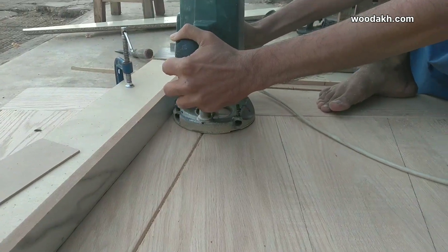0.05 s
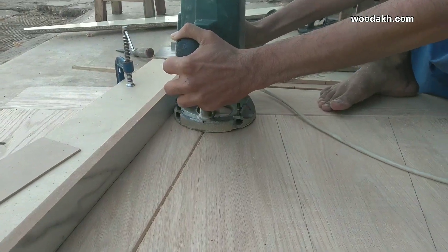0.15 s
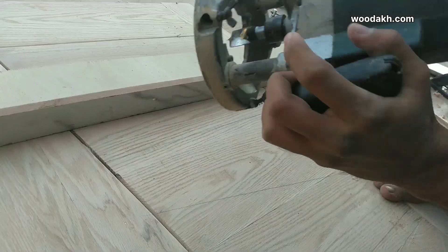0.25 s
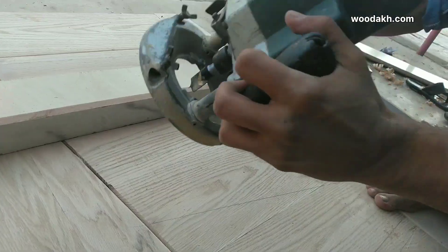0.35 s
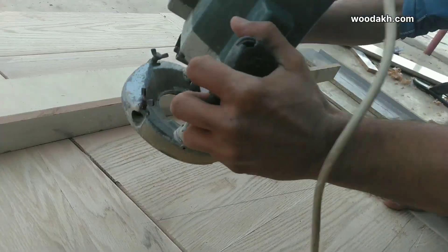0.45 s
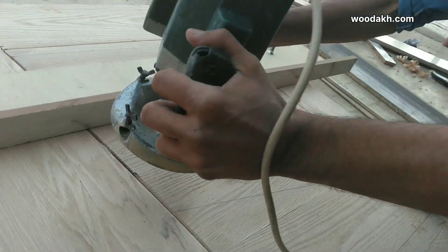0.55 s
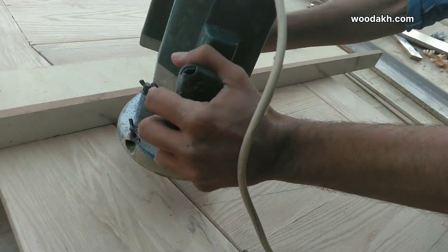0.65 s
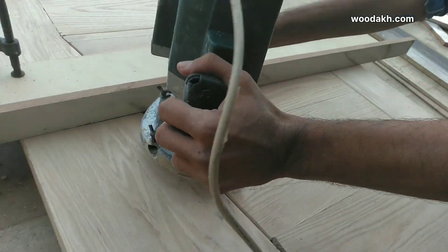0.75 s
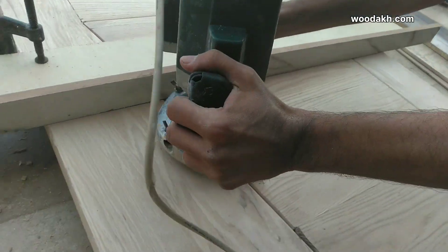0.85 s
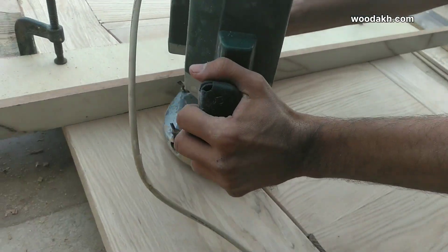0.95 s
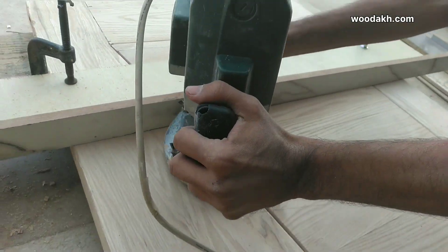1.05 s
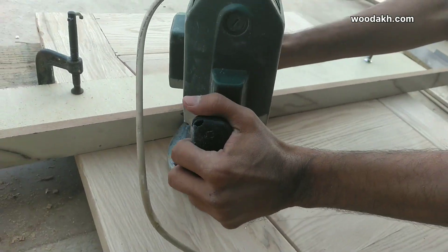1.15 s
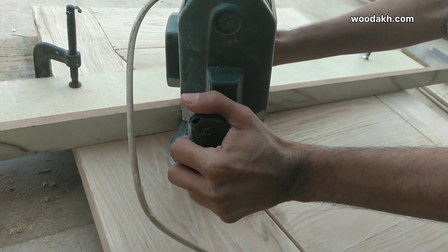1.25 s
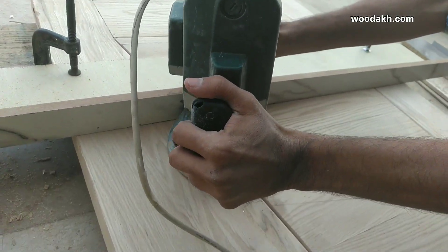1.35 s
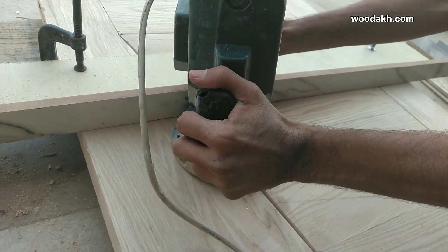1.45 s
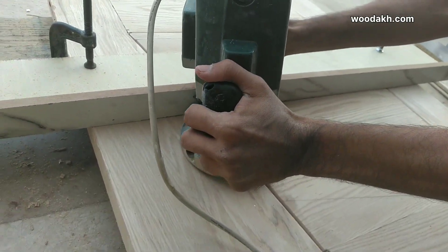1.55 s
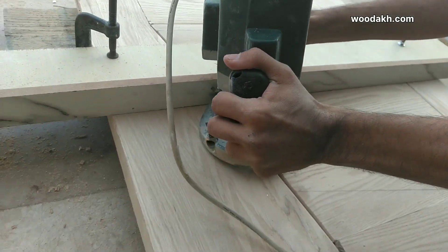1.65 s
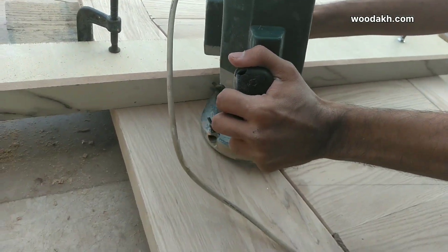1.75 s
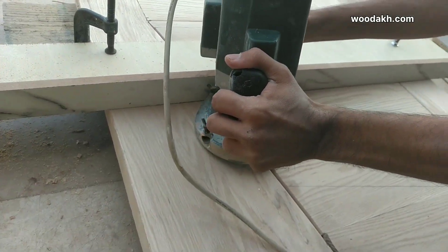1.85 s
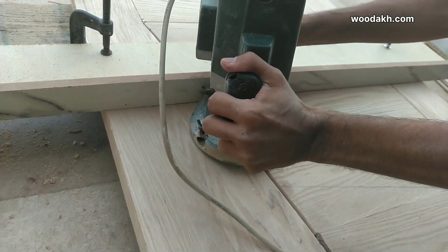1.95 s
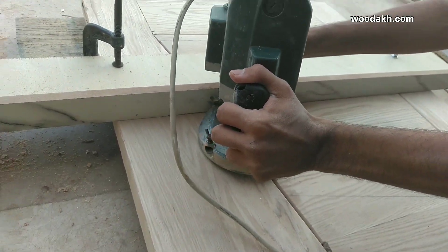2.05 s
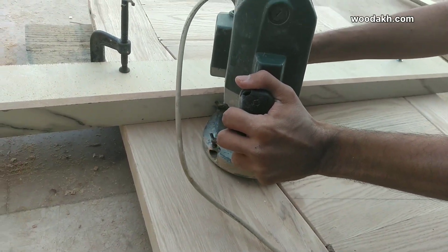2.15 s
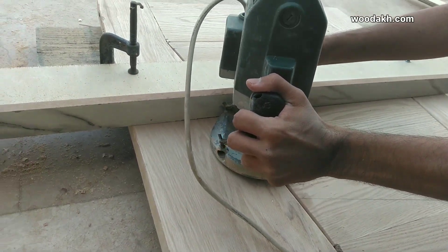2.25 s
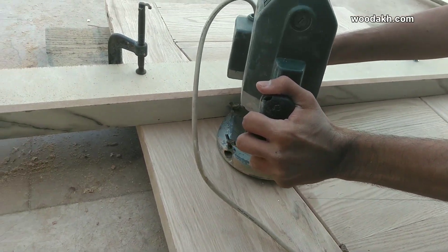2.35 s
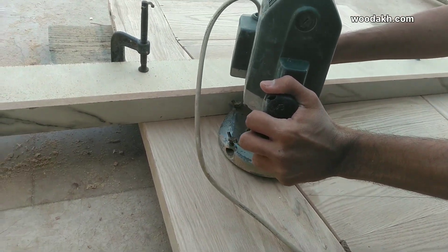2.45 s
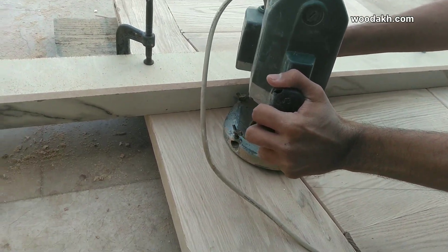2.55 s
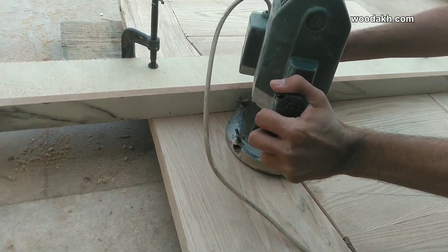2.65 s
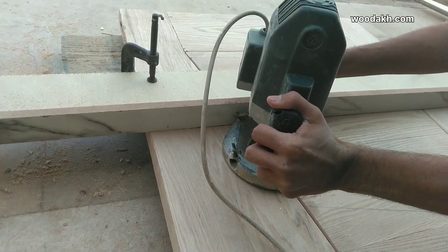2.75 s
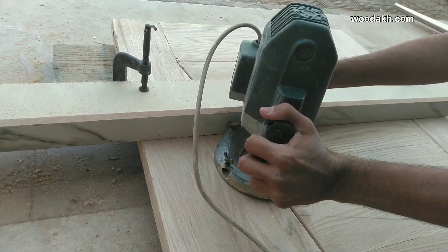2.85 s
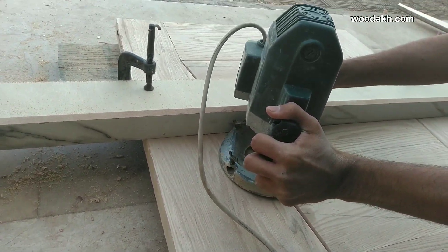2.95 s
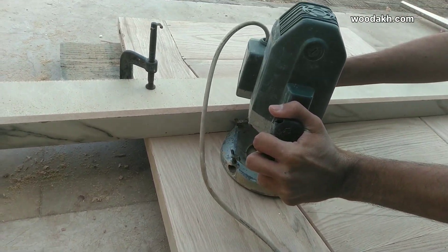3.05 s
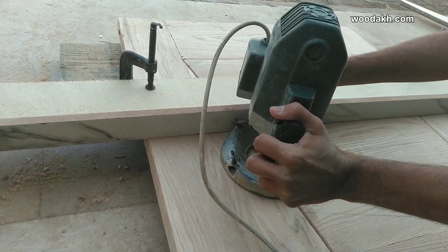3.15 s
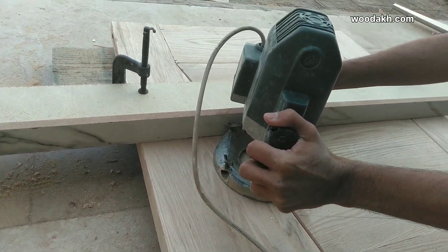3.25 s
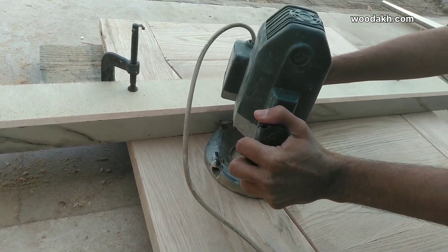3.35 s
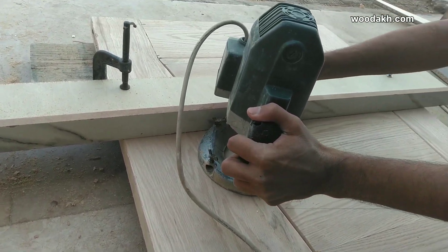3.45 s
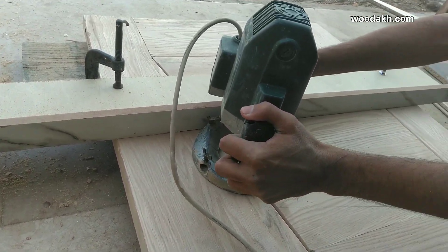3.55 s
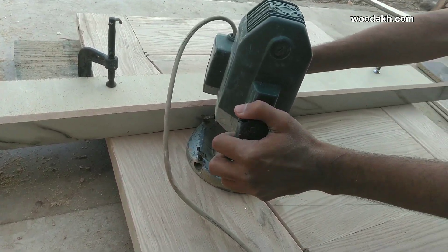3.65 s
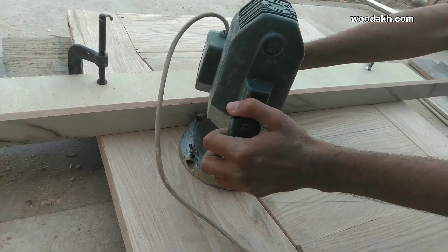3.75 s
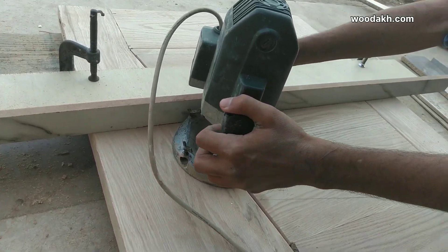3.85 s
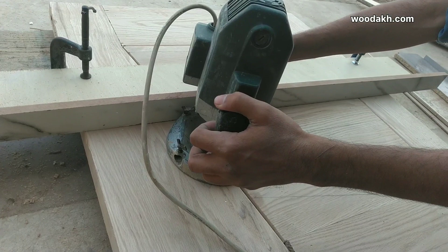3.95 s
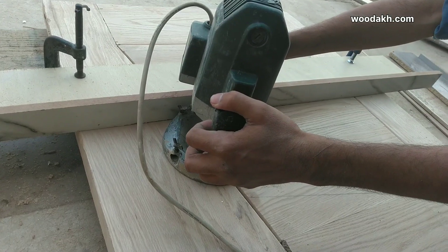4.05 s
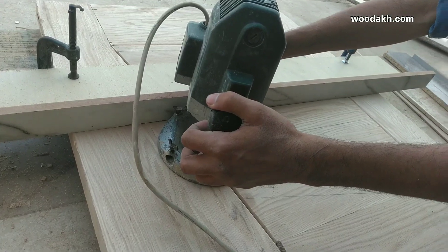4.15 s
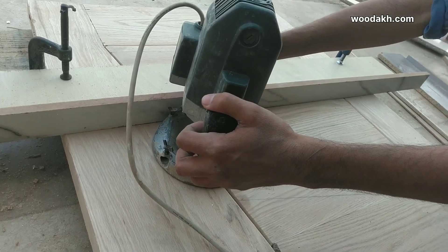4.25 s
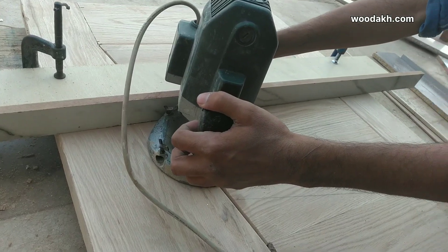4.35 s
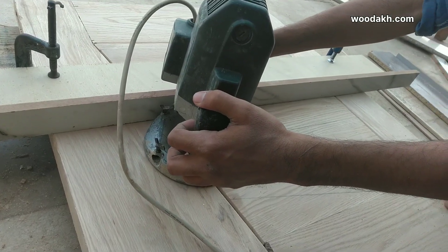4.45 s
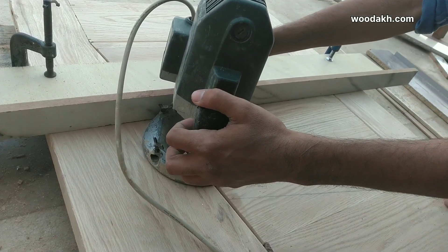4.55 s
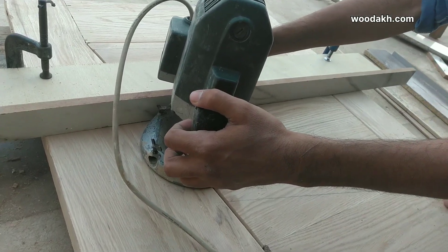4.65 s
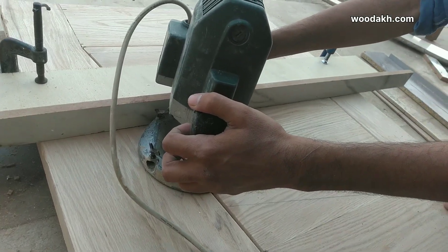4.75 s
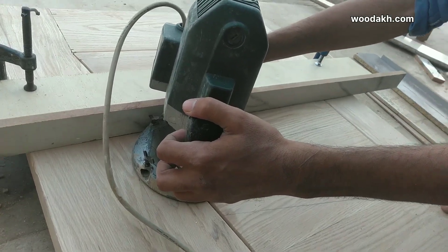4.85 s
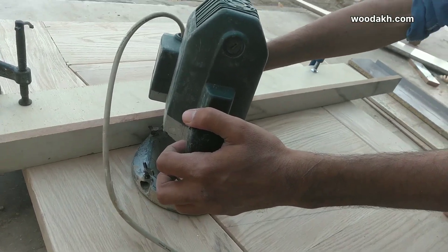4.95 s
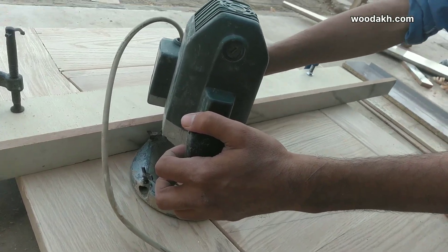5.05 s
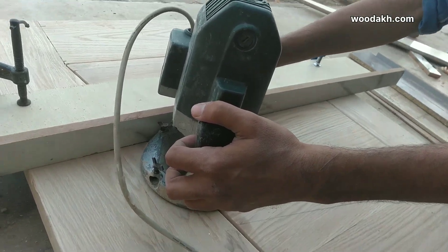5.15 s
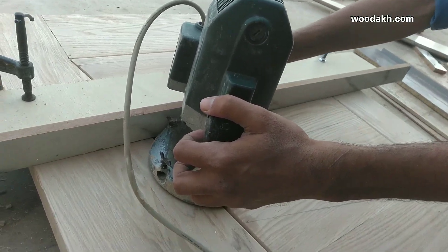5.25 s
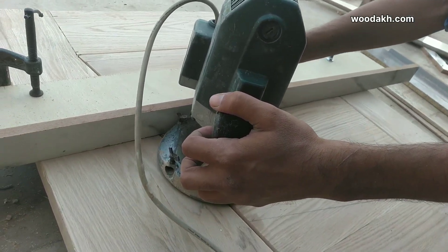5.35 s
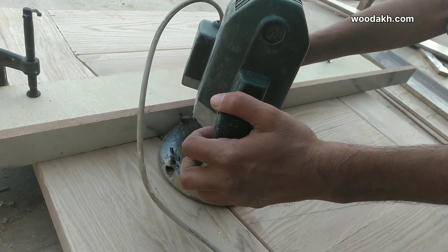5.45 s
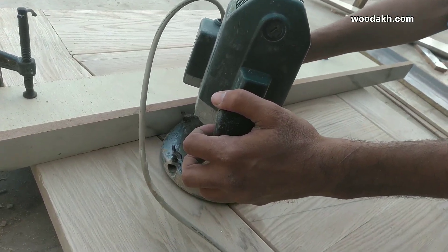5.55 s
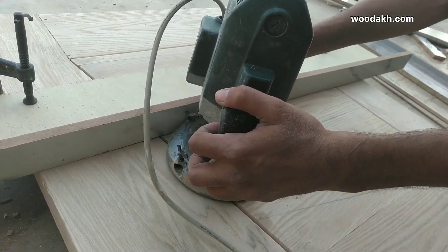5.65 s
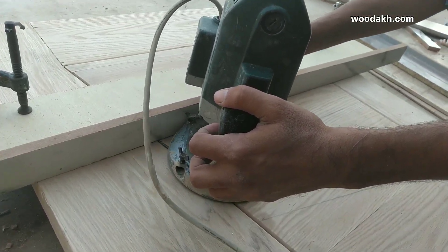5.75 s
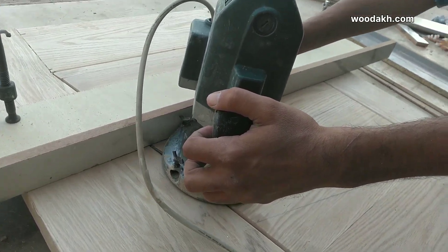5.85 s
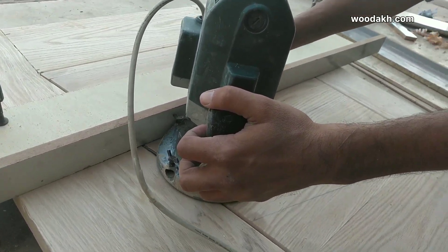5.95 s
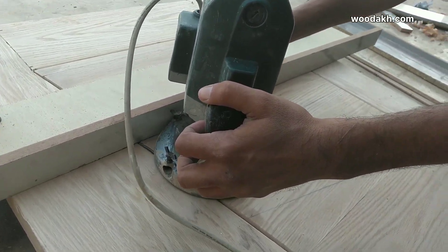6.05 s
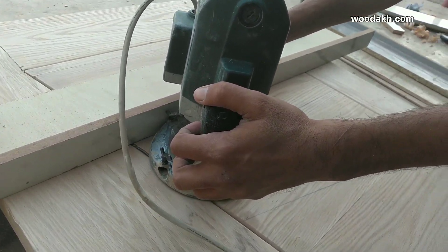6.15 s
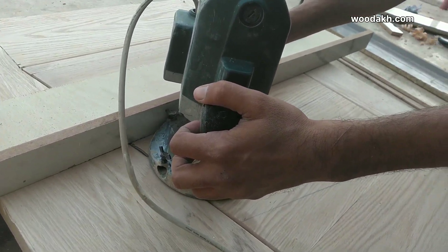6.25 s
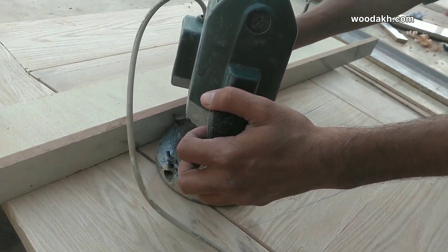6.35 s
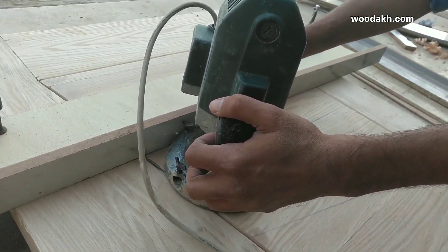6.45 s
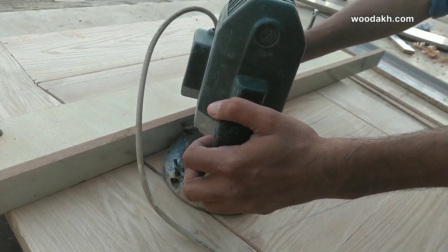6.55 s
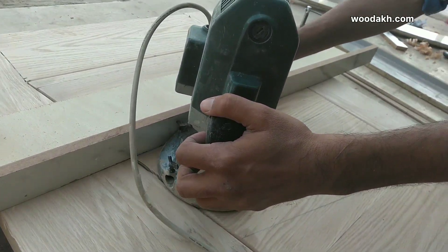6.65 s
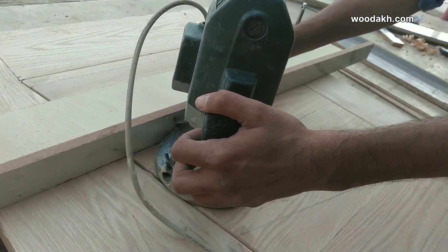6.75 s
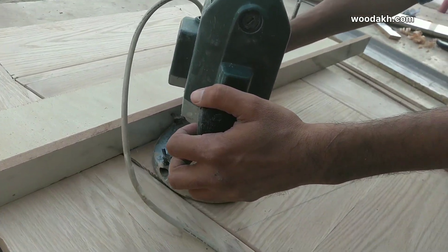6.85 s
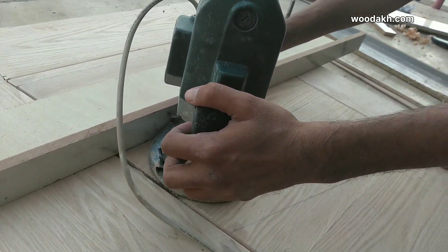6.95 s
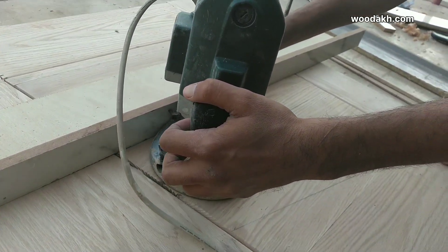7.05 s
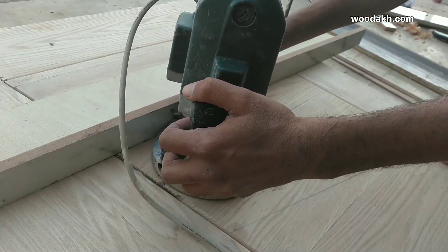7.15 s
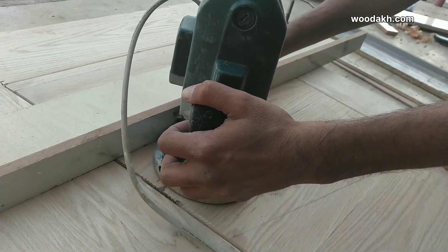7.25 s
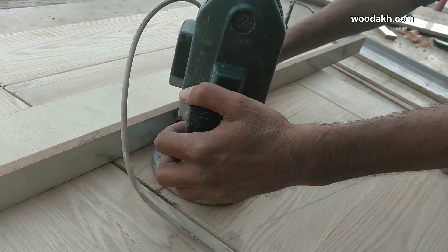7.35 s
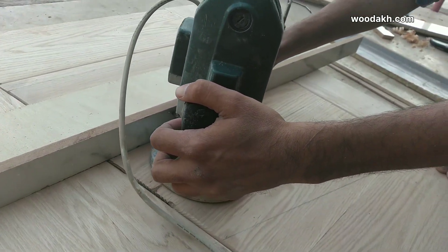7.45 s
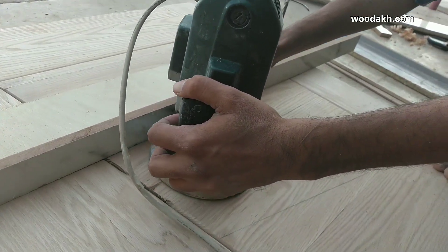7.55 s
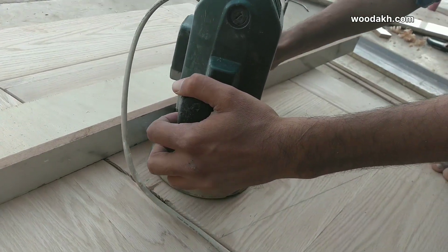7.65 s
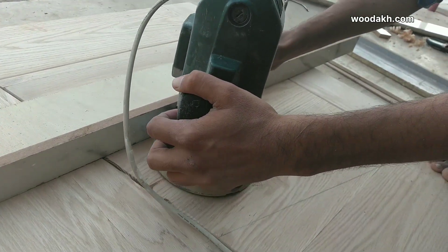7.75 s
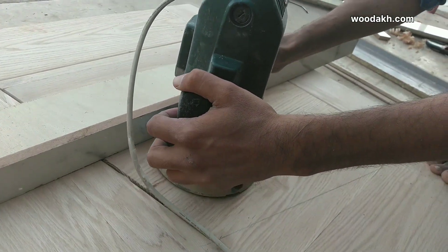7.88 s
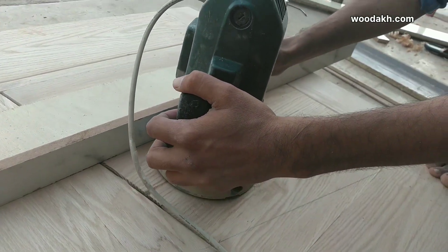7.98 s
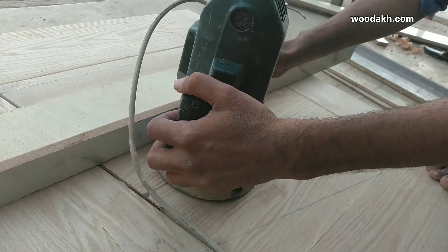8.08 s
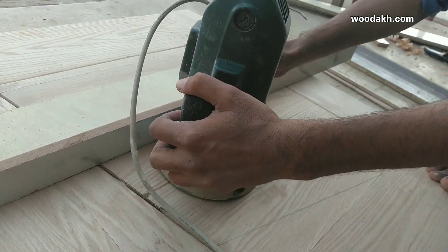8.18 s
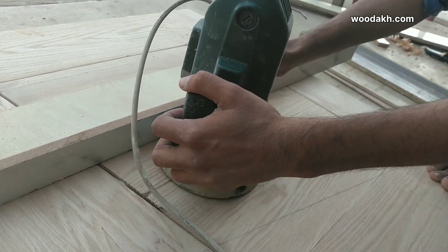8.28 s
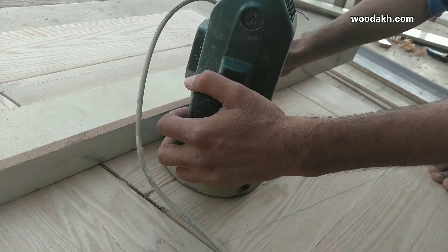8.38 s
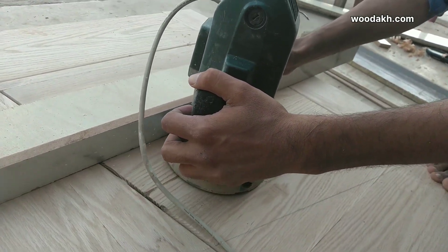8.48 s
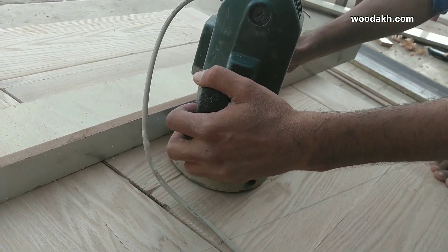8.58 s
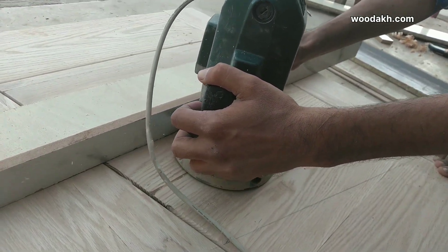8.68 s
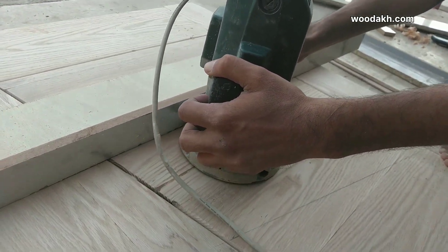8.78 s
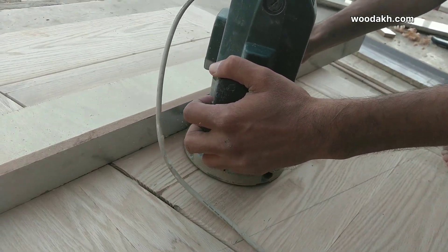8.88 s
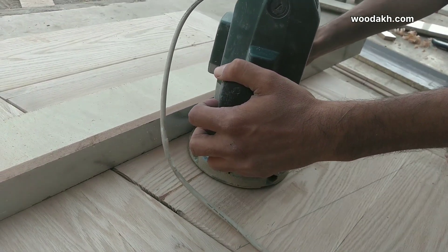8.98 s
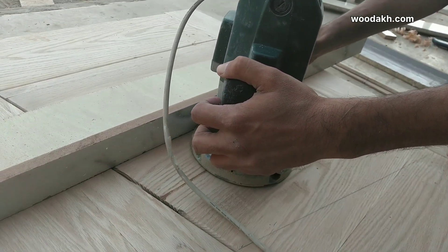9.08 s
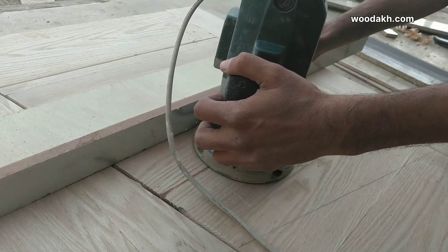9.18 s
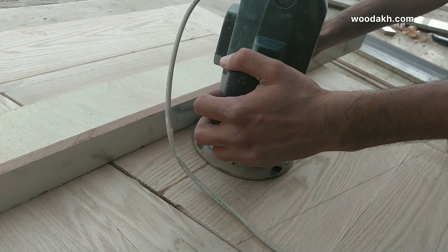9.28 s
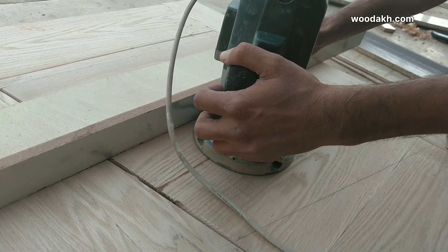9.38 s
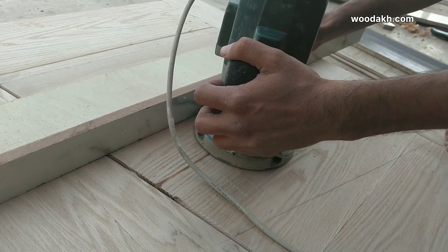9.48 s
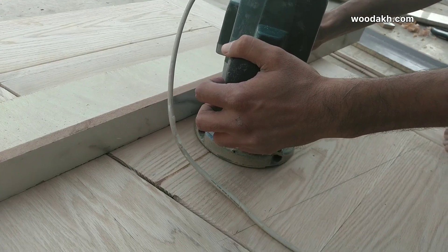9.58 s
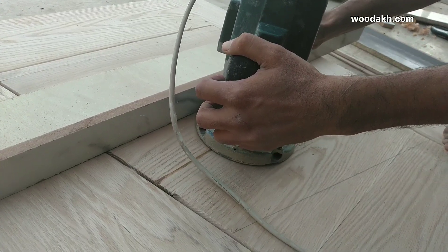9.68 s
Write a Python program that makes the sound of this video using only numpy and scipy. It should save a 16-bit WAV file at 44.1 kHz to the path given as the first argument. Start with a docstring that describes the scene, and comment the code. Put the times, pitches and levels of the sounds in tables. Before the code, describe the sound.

A short blast of electric router noise stops suddenly, leaving a low outdoor rumble, a faint hum and the tool's base rubbing and softly knocking on wood. With a click the motor restarts and rises quickly to a loud, close whine. It keeps cutting to the end, mixing the rasp of chips with fan hiss and a thin whistle, biting harder a few times and slowing a little.

```python
"""A handheld electric router cuts a solid wooden door outdoors, close to the microphone.
Its spinning shaft whines, its cutter tears off chips, its fan blows and its motor brushes hiss.
The sound breaks off abruptly; in the lull a distant machine hums and the router's base slides and
bumps on the wood. Then the switch clicks, the motor spins up and the cutter works along a
straightedge, slowing as it is pushed."""
import sys
import numpy as np
from scipy import signal
from scipy.fft import rfft, irfft, next_fast_len
from scipy.io import wavfile
from scipy.ndimage import uniform_filter1d, map_coordinates

SR = 44100
rng = np.random.default_rng(int(sys.argv[2]) if len(sys.argv) > 2 else 0)


def unload_audio(sound):
    """Save the sound as a 16-bit wav file, at the path given as the first command line argument."""
    columns = np.transpose(np.atleast_2d(sound))
    # keep every value between -1 and 1, then stretch to whole-number steps
    steps = np.round(np.clip(columns, -1, 1) * 32767)
    wavfile.write(sys.argv[1], SR, steps.astype(np.int16))


N = 428652
STOP_S, SPIN_UP_S, SWITCH_S = 0.234, 1.68, 1.69  # first run ends, motor starts, switch clicks

# How much the cut slows the shaft: time_s, lost_turns_per_s
SLOWDOWN = [(3.3, 0), (4, 3.5), (4.9, 1.24), (6, 0), (7.6, 6), (8.3, 6), (9.72, 14)]
# An "order" is a tone's pitch divided by the shaft's turns per second.
# The five strong whine tones in the short first run: order, level_db, left_minus_right_db, left_lag_rad
FIRST_WHINE = [(1, -19.5, 5.5, 0.24), (2, -30.5, -3, 0.092), (3, -34, 6, 0.84), (4, -26.5, -7, 0.66),
               (6, -46, -3, 2.07)]
# The same tones as the router moves along the door: time_s, left_db, right_db, left_lag_rad
WHINE_1 = [(1.86, -41, -38, 0), (1.93, -22, -32, 0), (2.06, -38, -39, 0), (2.2, -26, -35, .2),
           (2.7, -18.5, -25, .1), (3.3, -26.5, -36, .2), (3.42, -44, -46, .2), (3.8, -42.5, -49, .2),
           (4.25, -27, -35, .2), (5.7, -26.5, -36.5, .2), (6.1, -30, -40.5, .2), (8.3, -23.5, -30.5, .2),
           (9.7, -28.5, -33.5, .2)]
WHINE_2 = [(2.1, -40, -38, -2), (2.4, -30.5, -40, -1), (2.65, -31.5, -36, 1.3), (2.9, -24, -31, 0.1),
           (3.3, -21.5, -38, 3), (3.55, -23.5, -29, 4), (3.95, -22.5, -26.5, 5.5), (4.95, -18.5, -22, 6),
           (5.3, -21, -28.5, 5.5), (6.35, -27.5, -31, 7.5), (6.55, -23, -26, 5), (8.2, -24.5, -24, 7),
           (9.7, -21, -23, 6.5)]
WHINE_3 = [(2.3, -33, -45, -1.8), (2.97, -42, -48, 1.5), (3.17, -22.5, -30, 0.5), (3.5, -32, -40, 0.55),
           (3.98, -25, -26, 1.1), (4.25, -35, -36, .3), (4.75, -19, -29, 0.58), (5.6, -22, -35, 0.49),
           (6.3, -20, -32, 1.4), (7.5, -19.5, -30, 1.7), (7.95, -16.5, -28, 1.6), (8.9, -19, -25, 1.3),
           (9.3, -25, -23, 1.3), (9.7, -30, -24, 2)]
WHINE_4 = [(2.2, -41, -43, .5), (2.4, -36, -42, .5), (2.9, -30, -35, .9), (3.2, -25, -31, .9),
           (3.55, -23, -40, .7), (4.1, -24, -32, 1.4), (4.5, -27, -33, 2.1), (5.3, -28, -27, .9),
           (5.8, -22, -20, 1), (6.35, -15.5, -16.5, .9), (6.85, -18, -19, .9), (7.2, -22.5, -26, .8),
           (7.55, -21, -24, 1.6), (8.2, -25, -28, 1.8), (8.8, -13.5, -17, 1.5), (9.05, -17.5, -19.5, 1.5),
           (9.35, -9.5, -17, 1.4), (9.7, -11, -13.5, 1.8)]
WHINE_6 = [(3.1, -46, -46, .5), (3.25, -28, -28, -.2), (3.4, -19, -15.5, -1.6), (3.47, -15, -13, -2.4),
           (3.54, -15, -13, -3), (3.8, -20, -17, -2.7), (4.05, -28, -28, -3.4), (4.9, -32, -29, -2.8),
           (6.3, -41, -37, -2), (7.1, -34, -33, -3.3), (7.45, -25, -21, -3.5), (7.8, -28, -33, -4),
           (8.4, -31, -35, -6.5), (8.8, -40, -40, -7), (9.3, -25, -25, -6), (9.7, -32, -35, -6.4)]
# Weak shaft tones at top speed: order, left_db, right_db
SHAFT_TONES = [(5, -27, -29), (7, -37, -37), (8, -35, -45), (9, -38, -42), (10, -35, -38), (11, -37, -37),
               (12, -35, -38), (13, -40, -35), (14, -33, -32), (15, -41, -36), (16, -36, -34),
               (17, -42, -38), (18, -43, -39), (21, -46, -41), (24, -52, -38), (25, -46, -36)]
# Faint tones between the shaft tones. Two lie just below the third and fourth whine tones, making them
# beat and flutter; the rest come from the ball bearings. At top speed: order, left_db, right_db
IN_BETWEEN_TONES = [(2.976, -35, -40), (3.654, -36, -39), (3.978, -29, -33), (5.66, -38, -37),
                    (6.33, -41, -38), (10.96, -38, -42), (18.5, -42, -37)]
# Bearing tones that stand out for a while: start_s, rise_s, hold_s, fall_db_per_s, order, left_db, right_db
BEARING_SWELLS = [(0, .01, .22, 60, 4.71, -31, -31), (2.15, .1, .1, 23, 5.66, -32, -34),
                  (2.24, .08, .12, 23, 3.654, -28, -31), (3.5, .7, 1.1, 6, 29.23, -38, -30),
                  (3.6, .3, .1, 14, 3.654, -33, -46), (3.9, .6, 1.4, 4, 1.62, -38, -41),
                  (4.2, .5, 1.5, 2.5, 5.28, -34, -35.5)]
# A high bearing whistle after the restart: time_s, right_db
WHISTLE_LEVEL = [(1.8, -60), (3, -34), (3.6, -37), (4.2, -22), (4.8, -22.5), (5.1, -28), (6.8, -27),
                 (7.25, -37), (9.7, -43)]
# The tone that squeals during spin-up, at its loudest: order, left_db, right_db
SQUEAL_TONE = [(16, -10, -11)]
# Moments when the cutter bites hard: start_s, hold_s, level_db
BITES = [(3.26, 0.47, -27.5), (7.2, .25, -40), (9.1, .3, -40)]
# Tones that ring in a bite, relative to its level: order, left_db, right_db
BITE_TONES = [(8, -10, -13), (10, 4, -2), (11, -2, -11), (12, -5.5, -3.5), (14, -1.5, 0), (16, -2, -3),
              (18, -5, 1), (27, -8, -1)]

# The tone colour of each router noise: pitch_hz, relative_db
CUTTER_NOISE = [(30, -40), (70, -17), (115, -11), (160, -15), (240, -13.5), (420, -9.5), (750, -4.5),
                (1300, 0.5), (1950, -0.5), (2500, -4), (3400, -31), (6000, -60)]  # chips tearing off
VENT_NOISE = [(1500, -20.5), (2200, 5), (2500, -0.5), (2800, 2), (3200, 3), (3600, -4), (5000, -42)]  # air in the vent slots
FAN_NOISE = [(2000, -40), (3000, -10), (3600, -2.5), (4700, 0.5), (5800, -2.5), (6700, -2.5), (9000, -20.5),
             (16000, -38)]  # the cooling fan
BRUSH_NOISE = [(4000, -53), (6600, -18), (7600, -1), (8400, 0), (9100, 0), (9800, 2), (11000, -4.5),
               (11900, -10), (12600, -3.5), (14500, -5.5), (16000, -3.5)]  # the motor brushes
HOWL_NOISE = [(350, -16), (540, 4), (620, -17), (790, 4), (950, -22), (1250, -5), (1450, 7), (1620, -5),
              (1900, -30), (3500, -45)]  # the hollow under the base
# The brush hiss slowly swells and sinks; only the swing around the average counts: time_s, level_db
HISS_DRIFT = [(1.85, -16.5), (3.69, -17.5), (4.26, -16.5), (4.57, -18), (5.55, -17), (7.7, -19),
              (8.97, -19), (9.72, -21)]
# Two bands weakened by the echo off the door, shifting as the router moves: time_s, lower_hz, upper_hz
ECHO_DIPS = [(2, 2930, 6600), (2.6, 2840, 7100), (3.4, 2800, 7400), (4.5, 3080, 6470), (5.4, 2680, 6640),
             (6.4, 2700, 6500), (8, 2460, 6400), (9.7, 2450, 5900)]

# The base bumps on the door: start_s, peak_db
BUMPS = [(1.314, -25), (1.553, -19), (1.574, -19.5), (1.592, -28), (1.704, -21.5), (1.818, -20)]
# The notes the door rings with: pitch_hz, relative_db, time_to_fall_60_db_s
DOOR_NOTES = [(126, -7, 0.2), (190, -0.5, 0.055), (274, 2, 0.05), (410, 0.5, 0.051), (710, -8, 0.025),
              (1260, -21, .02)]
# The tone colour of the wood and outdoor noises: pitch_hz, relative_db
JUDDER_NOISE = [(40, -24), (75, -6), (130, 1), (200, -3), (270, -13), (450, -7), (1500, -86)]  # the shaking door panel
RUB_NOISE = [(200, -9), (550, -4), (900, -10), (1400, 0), (1900, 6), (2500, -10), (3500, -3), (4500, 0),
             (5800, -13), (12000, -17)]  # the base rubbing on the wood
SLIDE_NOISE = [(2500, -24), (3500, -18), (4500, -18), (5600, -25), (6670, -9), (7400, -2), (8320, -1.5),
               (9300, -6), (10100, -2), (10900, -12), (15800, -14)]  # the base hissing over the wood
RUMBLE_NOISE = [(15, -62), (25, -40), (70, -10), (125, -4.5), (224, -9), (309, -15), (352, -15), (392, -18),
                (600, -21), (780, -60), (1320, -120)]  # low outdoor rumble
YARD_NOISE = [(210, -32), (350, -8), (444, -30), (629, -21), (703, -12.5), (878, -19.5), (1440, -13.5),
              (2100, -16), (2600, -20), (4500, -21), (6180, -28.5), (6790, -24.5), (15500, -47)]  # open air
# A distant machine: pitch_hz, level_db
HUM = [(113.0, -46)]
# How alike a noise is on the left and right (1 the same, -1 opposite): pitch_hz, likeness
STEREO_LIKENESS = [(40, 0.65), (120, 0.8), (600, 0.58), (1250, 0.15), (1630, -0.65), (1950, -.5),
                   (2600, .1), (3300, .35), (4500, .35), (6000, .5), (8400, .3), (15000, .35)]
# Balance of the noises; the right microphone opening resonates in the treble: pitch_hz, left_minus_right_db
STEREO_BALANCE = [(100, 0.5), (500, 1.5), (1000, 1.5), (2000, -0.5), (2800, 3), (4200, 0), (5500, -2.5),
                  (6500, -1.5), (7600, -6), (8400, -9), (9400, -1.5), (11000, -0.5), (13000, 0),
                  (14500, -2)]


def router():
    """All the router's tones follow its shaft; the weak ones grow steeply with speed."""
    speed = shaft_speed()
    angle = 2 * np.pi * np.cumsum(speed * (1 + .0005 * wobble(12))) / SR
    effort = (speed / speed.max()) ** 3
    shaft = tones(SHAFT_TONES, angle, slip=.015, fade_db=3, lag=.7)
    in_between = tones(IN_BETWEEN_TONES, angle, slip=.035, fade_db=2.5, lag=.7)
    bite = sum(amp(db) * swell(s, .069, hold_s, fall_db_per_s=88) for s, hold_s, db in BITES)
    ringing = bite * tones(BITE_TONES, angle, slip=.028, fade_db=1.8, lag=.53)
    high_tones = bearing_whistle(angle) + spin_up_squeal(angle, speed)
    air = amp(-2 * bite / bite.max()) * door_echo(air_and_chips(angle))  # sinks a little in a bite
    strong_tones = whine(angle, speed, effort)
    weak_tones = effort ** 2 * (shaft + in_between)
    return strong_tones + weak_tones + bearing_swells(angle) + ringing + high_tones + air


def shaft_speed(first_run_hz=333, free_hz=335, leap_share=.44):
    """Turns per second: the motor leaps from rest, creeps toward free speed and is slowed by the cut."""
    free = free_hz * (leap_share * build_up(rise_s=.09) + (1 - leap_share) * build_up(rise_s=.66))
    return np.where(first_run(), first_run_hz, np.maximum(free - curves(SLOWDOWN)[0], 0))


def whine(angle, speed, effort):
    """Unbalance, cutting edges and fan sing the low orders, fluttering more until the motor is fast."""
    out = np.zeros((2, N))
    flutter_db = 1.2 + .8 * (1 - effort)
    paths = WHINE_1, WHINE_2, WHINE_3, WHINE_4, WHINE_6
    for path, (order, first_db, pan_db, first_lag) in zip(paths, FIRST_WHINE):
        first_values = [[first_db + pan_db / 2], [first_db - pan_db / 2], [first_lag]]
        left_db, right_db, lag = np.where(first_run(), first_values, curves(path))
        # Each tone grows with speed, up to the speed reached at its table's first time.
        full_speed = speed[round(path[0][0] * SR)]
        growth = np.clip(speed / full_speed, 1e-3, 1) ** 1.3
        phase = order * angle + .1 * flutter_db * wobble(25) + wobble(1)
        pair = np.array([amp(left_db) * np.cos(phase - lag), amp(right_db) * np.cos(phase)])
        flutter = amp(flutter_db * order ** .3 * wobble(20))  # higher tones flutter more
        out += np.sqrt(2) * growth * flutter * pair
    return out


def air_and_chips(angle):
    """Two unequal cutting edges tear chips at every turn, the fan blows through vents, brushes hiss."""
    running_s = np.maximum(np.arange(N) / SR - SWITCH_S, 0)
    chop = unit(1 + .09 * (np.cos(angle) + np.cos(2 * angle)))
    grain = unit(amp(.9 * wobble(600)))
    flicker_db = .5 * wobble(16)
    chips = noise(CUTTER_NOISE, patchy_db=2.5, lag_s=.000092) * chop
    cutter = amp(-21 + flicker_db) * build_up(rise_s=.097) * chips
    # Vent and fan fade as the router moves along the door.
    vent_db = -22 - .3 * running_s + .7 * wobble(7)
    vent = amp(vent_db + flicker_db) * build_up(rise_s=.1) * noise(VENT_NOISE, patchy_db=1.8)
    fan_db = np.where(first_run(), -19, -15.5 - .19 * running_s)
    fan = amp(fan_db + flicker_db) * build_up(rise_s=.17) * noise(FAN_NOISE, patchy_db=1.8)
    drift_db, = curves(HISS_DRIFT)
    hiss_db = -15.5 + drift_db - drift_db.mean()
    brushes = noise(BRUSH_NOISE, patchy_db=1.5) * unit(1 + .046 * np.cos(angle))
    hiss = amp(hiss_db + flicker_db) * build_up(rise_s=.072) * brushes
    howl = amp(-21.5) * first_run() * noise(HOWL_NOISE, patchy_db=1.5)
    return cutter + howl + grain * (vent + fan + hiss)


def door_echo(sound, ripple_db=1.9, ripple_rad=.75, full_ripple_hz=2300):
    """Echoes off the door, arms and straightedge carve two gliding dips and fine ripples in the noise."""
    hz, t, spectrum = signal.stft(sound, SR, nperseg=1024)

    def band(centre_hz, width_hz):
        return np.exp(-((hz[:, None] - centre_hz) / width_hz) ** 2)

    time_s, lower_hz, upper_hz = np.transpose(ECHO_DIPS)
    dips_db = -5 * band(np.interp(t, time_s, lower_hz), 370)
    dips_db -= 4 * band(np.interp(t, time_s, upper_hz), 550)
    # From 3.3 s on, one band of the hiss leans ever more to the right.
    lean_db = .82 * np.maximum(t - 3.3, 0) * band(7920, 900)
    patches = rng.standard_normal((2, *spectrum.shape))
    for _ in range(2):  # smooth over pitch, then over time
        patches = uniform_filter1d(uniform_filter1d(patches, size=4, axis=2), size=55, axis=3)
    ripple, turn = unit(patches) * np.minimum(hz / full_ripple_hz, 1)[:, None]
    gain = amp(dips_db + ripple_db * ripple + np.array([-lean_db, lean_db]))
    return signal.istft(spectrum * gain * np.exp(1j * ripple_rad * turn), SR, nperseg=1024)[1][:, :N]


def bearing_swells(angle):
    """Single ball bearing tones swell, hold and fade."""
    out = np.zeros((2, N))
    for start_s, rise_s, hold_s, fall_db_per_s, order, left_db, right_db in BEARING_SWELLS:
        tone = tones([(order, left_db, right_db)], angle, slip=.3 / order, fade_db=1.2, lag=.2)
        out += swell(start_s, rise_s, hold_s, fall_db_per_s) * tone
    return out


def bearing_whistle(angle, order=25.58, left_minus_right_db=-16):
    """A ball bearing whistles high up, mostly on the right."""
    level_db = np.where(first_run(), -27, curves(WHISTLE_LEVEL)[0])
    tone = tones([(order, left_minus_right_db, 0)], angle, slip=.012, fade_db=1.5, lag=.7)
    return amp(level_db) * tone


def spin_up_squeal(angle, speed, resonance_hz=2000, width_hz=150):
    """One rising tone squeals as it sweeps through a resonance, a pitch that rings easily."""
    pitch_hz = SQUEAL_TONE[0][0] * speed
    gain = 1 / np.hypot(1, 2 * (pitch_hz - resonance_hz) / width_hz)
    return gain * tones(SQUEAL_TONE, angle + .06 * wobble(250), slip=.06, fade_db=1, lag=.16)


def switch_click(centre_hz=9100, width_hz=20000, fall_60_db_s=.022):
    """The switch snaps on with one short, bright burst of noise."""
    out, t = np.zeros((2, N)), np.arange(SR // 4) / SR
    hz = np.fft.rfftfreq(len(t), 1 / SR)
    colour = np.exp(-2 * ((hz - centre_hz) / width_hz) ** 2)
    burst = irfft(rfft(rng.standard_normal((2, len(t)))) * colour, len(t))
    add(out, SWITCH_S, amp(-17 - 60 * t / fall_60_db_s) * unit(burst))
    return out


def door_knocks():
    """The base bumps softly and later judders once in the cut, making the wooden panel ring."""
    t = np.arange(SR // 4) / SR
    judder = swell(start_s=4.38, rise_s=.06, hold_s=0, fall_db_per_s=31)
    out = amp(-32) * judder * noise(JUDDER_NOISE, patchy_db=5.5, lag_s=0)
    for start_s, peak_db in BUMPS:
        knock = np.zeros(len(t))
        for hz, db, fall_s in DOOR_NOTES:
            fade = amp(db + rng.normal(0, 2.8) - 60 * t / fall_s)
            knock += fade * np.sin(2 * np.pi * (hz * t + rng.random()))
        knock *= 1 - np.exp(-t / .003)  # soften the start
        add(out, start_s, amp(peak_db) * knock / abs(knock).max())
    return out


def sliding_base():
    """The base is slid into place on the wood: it rubs dully first, then hisses."""
    rub = amp(-35) * swell(start_s=.75, rise_s=.14, hold_s=0, fall_db_per_s=3)
    slide = amp(-29.5) * swell(start_s=.925, rise_s=.05, hold_s=.099, fall_db_per_s=52)
    return (rub * noise(RUB_NOISE, patchy_db=2.5, lag_s=0)
            + slide * noise(SLIDE_NOISE, patchy_db=4, lag_s=0))


def yard():
    """A distant machine hums over a low rumble and the soft rush of open air."""
    t = np.arange(N) / SR
    hum_hz, hum_db = HUM[0]
    hum_gain = np.sqrt(2) * amp(hum_db + 2.1 * wobble(4))
    hum = hum_gain * np.sin(2 * np.pi * hum_hz * t + .5 * wobble(4.6))
    rumble = amp(-38.5 + .59 * wobble(9.3)) * noise(RUMBLE_NOISE, patchy_db=3, lag_s=0)
    air = amp(-36.5) * noise(YARD_NOISE, patchy_db=1.5, lag_s=0)
    return hum + rumble + air


def tones(table, angle, slip, fade_db, lag):
    """Wavering tones tied to the shaft; slip (jitter) and lag (left delay) are in radians of its turn."""
    out = np.zeros((2, N))
    for order, left_db, right_db in table:
        phase = order * (angle + slip * (wobble(45) + wobble(8)))
        gain = np.sqrt(2) * amp(fade_db * (.7 * wobble(1.6) + .8 * wobble(15)))
        left = amp(left_db) * np.sin(phase - lag * order)
        right = amp(right_db) * np.sin(phase)
        out += gain * np.array([left, right])
    return out


def noise(colour, patchy_db, lag_s=.0003485):
    """Stereo noise of strength 1 with drifting loud and soft patches; the left side is lag_s late."""
    white = signal.stft(rng.standard_normal((2, N)), nperseg=512)[2]
    patches = uniform_filter1d(rng.standard_normal(white.shape[1:]), size=2, axis=0)
    patches = uniform_filter1d(patches, size=24, axis=1)
    pair = signal.istft(white * amp(patchy_db * unit(patches)), nperseg=512)[1][:, :N]
    size = next_fast_len(N + SR // 4)
    hz = np.fft.rfftfreq(size, 1 / SR)
    # "mid" is shared by both sides; "side" is added on the left and taken away on the right.
    spread = np.arccos(np.clip(at_pitch(STEREO_LIKENESS, hz), -1, 1)) / 2
    mid, side = rfft(pair, size) * amp(at_pitch(colour, hz)) * [np.cos(spread), np.sin(spread)]
    lean = amp(at_pitch(STEREO_BALANCE, hz) / 2) * np.exp(-1j * np.pi * hz * lag_s)
    return unit(irfft([(mid + side) * lean, (mid - side) / lean], size)[:, :N])


def swell(start_s, rise_s, hold_s, fall_db_per_s):
    """A gain that rises to 1, holds and dies away."""
    t = np.arange(N) / SR - start_s
    return np.clip(t / rise_s, 0, 1) * amp(-fall_db_per_s * np.maximum(t - rise_s - hold_s, 0))


def build_up(rise_s):
    """1 in the first run; from the restart on, it climbs from 0 and levels off at 1."""
    t = np.arange(N) / SR
    return np.where(first_run(), 1, 1 - np.exp(-np.maximum(t - SPIN_UP_S, 0) / rise_s))


def first_run():
    """True until the middle of the lull."""
    return np.arange(N) / SR < (STOP_S + SWITCH_S) / 2


def wobble(rate_hz):
    """A smooth random curve through rate_hz random points a second."""
    points = rng.standard_normal(int(N * rate_hz / SR) + 4)
    coarse = np.arange(0, N + 64, 64)
    return np.interp(np.arange(N), coarse, map_coordinates(points, [coarse * rate_hz / SR]))


def curves(table):
    """Join a table's timed rows with straight lines: one value per sample for each later column."""
    time_s, *columns = np.transpose(table)
    return [np.interp(np.arange(N) / SR, time_s, column) for column in columns]


def at_pitch(table, hz):
    """Read between a table's (pitch_hz, value) rows, with octaves evenly spaced."""
    pitch_hz, values = np.transpose(table)
    return np.interp(np.log(hz + 1), np.log(pitch_hz + 1), values)


def filtered(sound, response):
    """Multiply each frequency in a sound by response(hz)."""
    size = next_fast_len(N + SR // 4)
    return irfft(rfft(sound, size) * response(np.fft.rfftfreq(size, 1 / SR)), size)[..., :N]


def amp(db):
    """Turn decibels into a gain to multiply by."""
    return 10 ** (np.asarray(db) / 20)


def unit(x):
    """Scale to an average strength (root mean square) of 1."""
    return x / np.sqrt(np.mean(x ** 2) + 1e-20)


def add(track, start_s, sound):
    """Mix a sound into a track at start_s."""
    track[..., round(start_s * SR):][..., :sound.shape[-1]] += sound


def scene():
    """The router cuts out and restarts; the yard and the sliding base sound only in the lull."""
    t = np.arange(N) / SR
    running = np.clip((STOP_S - t) / .0076 + 1, 0, 1) + np.clip((t - SWITCH_S) / .0072, 0, 1)
    lull = 1 - running
    return running * router() + lull * (yard() + sliding_base()) + door_knocks() + switch_click()


def record(dry, bass_hz=35, top_hz=15850):
    """The recorder thins the deep bass, rounds the highest peaks and keeps nothing above top_hz."""
    thinned = filtered(dry, lambda hz: 1j * hz / (1j * hz + bass_hz))
    rounded = thinned / (1 + np.abs(thinned) ** 8) ** (1 / 8)
    return filtered(rounded, lambda hz: hz < top_hz)


dry = scene()
out = record(dry)
unload_audio(out)
```